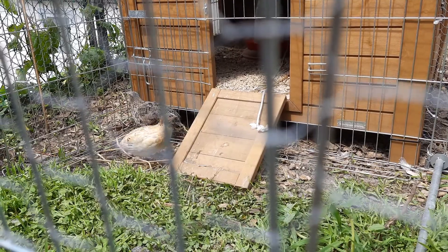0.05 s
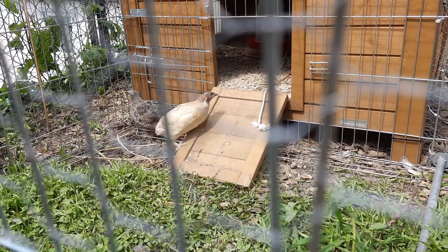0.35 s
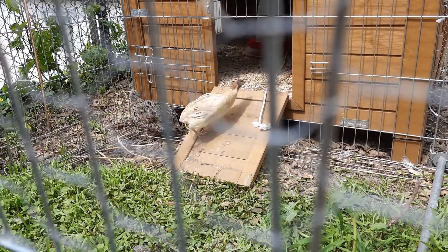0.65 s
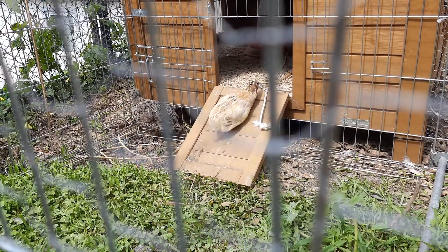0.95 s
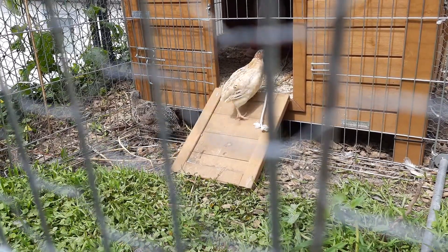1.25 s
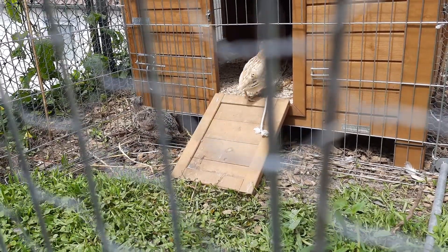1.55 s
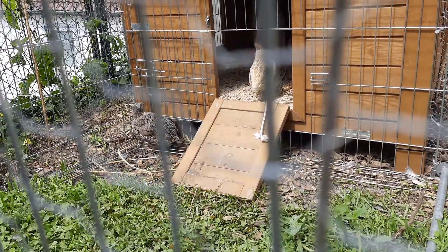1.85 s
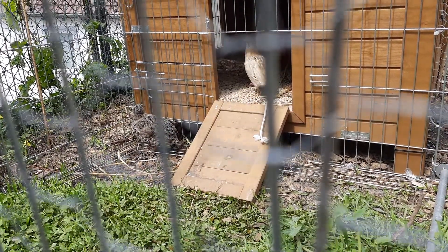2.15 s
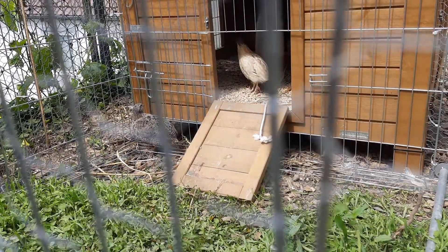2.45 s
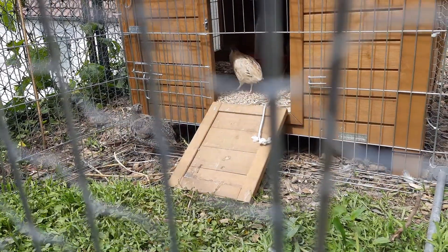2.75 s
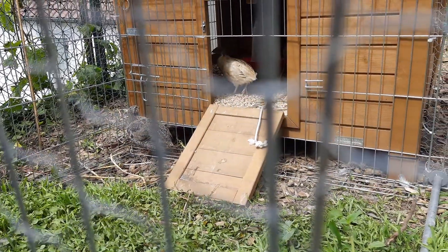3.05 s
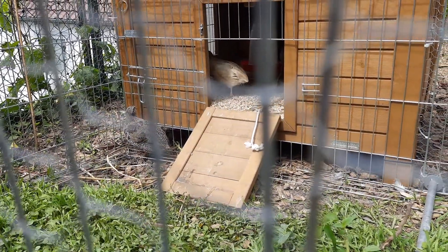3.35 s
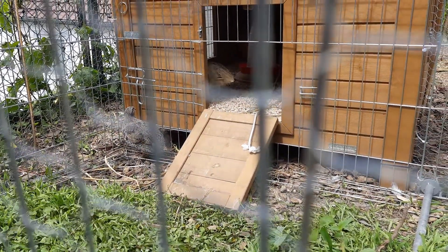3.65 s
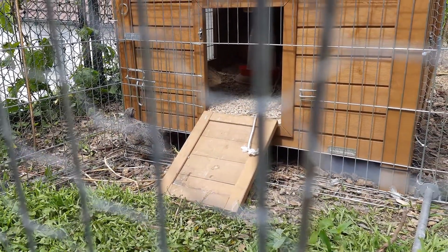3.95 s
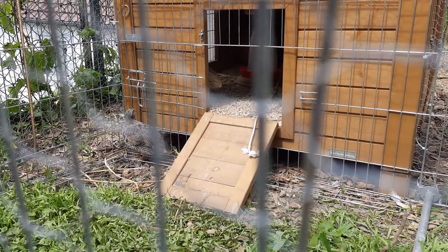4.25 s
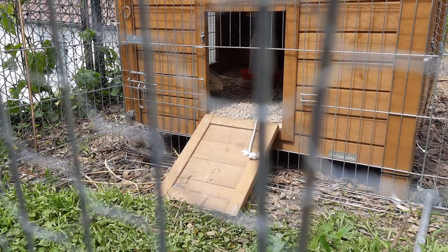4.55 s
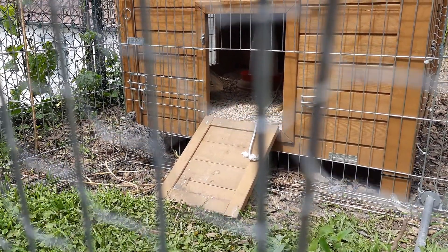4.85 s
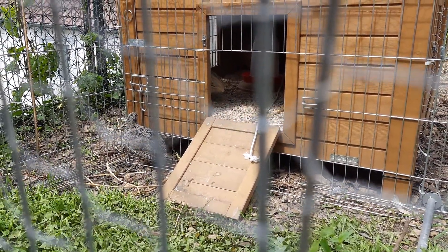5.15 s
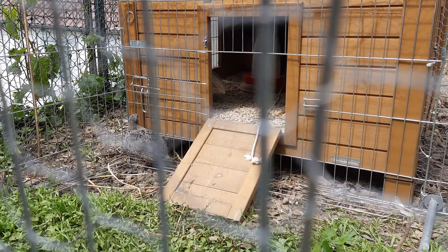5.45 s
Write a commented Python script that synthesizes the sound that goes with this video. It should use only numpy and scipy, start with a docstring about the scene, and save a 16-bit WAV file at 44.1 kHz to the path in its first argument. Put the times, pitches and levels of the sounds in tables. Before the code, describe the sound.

A quail's claws click, scratch and knock quickly on a wooden ramp, over a light crackle of dry litter. The steps stop within two seconds, leaving a few tiny rustles of shavings inside the hutch. Low wind buffets the microphone from side to side throughout, strongest at first. Faint songbirds and a dove call from the surrounding gardens with a short echo.

```python
"""First you hear wind thumping on the two ports (openings) of a microphone, in turn, with faint songbirds.
A quail scratches through dry litter and scrambles up a wooden ramp: its claws tick and scrape,
and each step makes the wood ring. From about two seconds on, it only stirs the bedding in its hutch.
Songbirds and a dove keep calling from the gardens around: gliding tones with a short echo.
The wind is low noise that swells with each gust; scrapes and rustles are bursts of crackly noise."""
import sys
import numpy as np
from scipy import signal
from scipy.fft import rfft, irfft, next_fast_len
from scipy.io import wavfile
from scipy.ndimage import uniform_filter1d, map_coordinates

SR = 44100
rng = np.random.default_rng(int(sys.argv[2]) if len(sys.argv) > 2 else 0)


def to_wav(s):
    """Save 16-bit WAV."""
    ch = np.atleast_2d(s).T  # columns
    pcm = np.round(np.clip(ch, -1, 1) * 32767)  # PCM
    wavfile.write(sys.argv[1], SR, pcm.astype(np.int16))


N = 242989  # samples, about 5.5 seconds

# Levels in the tables are relative: the functions turn whole layers up or down.
# A fade time is how long a sound takes to drop by 60 dB.

# Gusts on each port, and how rough the air is. Each row: time in seconds, level in dB.
GUSTS_LEFT = [(0.0, -38), (0.34, -27), (0.46, -40), (0.74, -26), (0.84, -54), (0.96, -33.5), (1.22, -28.5),
              (1.42, -59), (2.02, -49), (2.1, -30), (2.2, -47.5), (2.72, -33.5), (2.77, -51.5),
              (3.41, -41.5), (3.63, -65), (4.23, -78), (4.29, -49), (4.47, -77), (4.93, -38.5), (5.11, -57),
              (5.27, -47), (5.51, -63)]
GUSTS_RIGHT = [(0.0, -29.5), (0.079, -27.5), (0.141, -33), (0.2, -24.5), (0.4, -26.5), (0.5, -23.5),
               (0.56, -34.5), (1.84, -28), (2.02, -48), (2.16, -37.5), (2.28, -56), (2.459, -30),
               (2.52, -59), (2.85, -56.9), (2.95, -39), (3.23, -41), (3.29, -64), (3.37, -37),
               (4.072, -31.5), (4.19, -55), (4.25, -42.5), (4.392, -64), (4.452, -30), (4.629, -33),
               (4.71, -62.7), (4.911, -31.5), (4.97, -50.5), (5.51, -32)]
ROUGHNESS = [(0, 6), (1.85, -0.5), (2.6, -1), (4, -8.5), (5.51, -2)]
# Small swirls of air that hit a port.
# Each row: time in seconds, peak in dB, width in seconds, port (0 is left, 1 is right).
SWIRLS = [(0.073, -6, 0.0015, 1), (0.169, -11.5, 0.0014, 1), (0.205, -5, 0.0028, 1),
          (0.302, -5.5, 0.0011, 0), (0.313, -11, 0.001, 0), (.485, -2.5, 0.0012, 1), (.615, -11, 0.0016, 0),
          (1.342, -10.5, 0.0023, 1), (1.519, -16.5, 0.0015, 1), (1.826, -15, 0.0015, 1),
          (2.584, -13.5, 0.0022, 0), (4.457, -29.5, 0.0018, 1)]
# The wind's deep rumble and its finer churning. Each row: frequency in Hz, level in dB.
RUMBLE_TONE = [(20, -41), (35, -6), (55, 1), (110, 0.5), (160, -14.5), (250, -25), (400, -43), (800, -56),
               (2000, -93)]
CHURN_TONE = [(60, -4.5), (150, 12), (290, -2.5), (400, -10.5), (700, -31), (1500, -48.5), (5000, -68),
              (12000, -89)]

# Outdoor hush and a blur of far birds. Each row: time in seconds, level in dB.
HUSH_LEVEL = [(0, -66.5), (1.7, -68), (2.7, -70.5), (3.8, -69.5), (4.3, -72.5), (5.1, -71.5), (5.51, -69)]
CHORUS_LEVEL = [(0, -45.5), (.6, -88), (1.3, -68), (1.8, -57.5), (2.5, -61), (3, -55.5), (3.7, -53),
                (4.1, -68.5), (5.51, -83)]
# The tone of those two, and of a far rumble. Each row: frequency in Hz, level in dB.
HUSH_TONE = [(120, -36.5), (200, -3), (525, -11), (607, -19), (1330, -21.5), (2090, -14.5), (2850, -25.5),
             (4260, -33), (5110, -37.5), (6710, -35), (8200, -28.5), (10600, -41.5), (13900, -35.5),
             (15500, -41)]
CHORUS_TONE = [(1200, -45), (1750, -11), (2230, 9.5), (2500, 0), (2900, -15), (4500, -43)]
FAR_RUMBLE_TONE = [(20, -11), (45, 5.5), (70, -15.5), (150, -18), (400, -49), (1000, -61)]

# Mellow songbird whistles and dove coos. Each row: start in seconds, length in seconds,
# first pitch in Hz, last pitch in Hz, level in dB, hoarseness (waver as a share of the pitch).
WHISTLE_NOTES = [(0, 0.11, 2270, 2320, -82, 0.016), (.1, 0.29, 3280, 3230, -80, .008),
                 (.245, 0.14, 2164, 2300, -63, 0.0235), (1.07, .1, 2670, 2840, -71.5, 0.031),
                 (1.17, 0.19, 2620, 2400, -64, 0.017), (1.67, 0.16, 2130, 2285, -69.5, 0.039),
                 (2.18, 0.22, 2208, 2130, -76, 0.0077), (2.42, 0.43, 2420, 2570, -78.5, 0.0045),
                 (2.455, 0.022, 2113, 1953, -63.5, .006), (2.59, 0.15, 1990, 1755, -62, 0.0054),
                 (2.71, 0.078, 1780, 2030, -65, 0.018), (3.02, 0.069, 2410, 2310, -59.5, .008),
                 (3.05, 0.097, 2256, 2320, -56.5, 0.0087), (3.15, .11, 2303, 2356, -62.5, .03),
                 (3.3, 0.147, 2415, 2290, -62.5, 0.021), (4.1, .07, 1780, 1648, -71.5, 0.026),
                 (4.21, 0.09, 2093, 2135, -67, .004), (4.48, .12, 2420, 2307, -68.5, 0.015),
                 (4.88, 0.084, 1780, 1658, -71, 0.03), (5.26, 0.1, 1900, 2016, -65.5, 0.023),
                 (5.42, 0.088, 2040, 2149, -63.5, 0.016)]
DOVE_NOTES = [(2.15, 0.28, 423.3, 402.5, -74, 0.036), (2.54, 0.12, 414, 421, -71, 0.018),
              (3.42, .12, 498, 515, -72, 0.044), (5.275, 0.035, 456, 561, -61, 0.098),
              (5.42, 0.081, 556, 521, -62.5, 0.032)]
# Thin, raspy twitters. Each row: start in seconds, length in seconds, middle pitch in Hz, level in dB.
TWITTER_NOTES = [(0, 0.28, 4870, -74.5), (1.53, 0.19, 4800, -75), (2.304, 0.023, 4810, -69.5),
                 (2.389, 0.023, 4880, -72), (2.827, 0.034, 2690, -64), (2.979, 0.068, 4290, -74.5),
                 (3.009, .09, 3450, -75.5), (3.163, 0.066, 5800, -81), (3.28, .06, 5680, -82),
                 (3.39, 0.14, 6030, -85), (3.489, .13, 5600, -83), (4.205, .1, 4550, -80),
                 (4.49, 0.1, 4090, -74.5), (5.218, .08, 4010, -79)]
# Sharp chips, sung in pairs. Each row: start in seconds, level in dB.
CHIP_NOTES = [(3.81, -71.5), (3.873, -65), (4.077, -70.5), (4.144, -64.5), (5.375, -69.5), (5.463, -67)]
# A far bird's trills. Each row: start in seconds, end in seconds, chirps per second, level in dB.
TRILLS = [(0.966, 1.26, 33.4, -62), (1.382, 1.638, 24, -68.5), (1.78, 1.883, 27, -61)]
# The garden's echo. Each row: frequency in Hz, fade time in seconds.
ECHO_FADE = [(300, 0.2), (2000, 0.5), (6000, 0.31), (14000, 0.21)]

# Litter rustling underfoot, and feet shuffling between steps. Each row: time in seconds, level in dB.
LITTER_LEVEL = [(0, -71), (.22, -76), (.33, -61), (.49, -68), (.79, -54.5), (.83, -53), (.96, -68),
                (1.2, -65), (1.46, -71.5), (1.9, -81)]
SHUFFLE_LEVEL = [(.22, -78), (.42, -59.5), (.52, -62.5), (.85, -58.5), (1.25, -64.5), (1.7, -71)]
# Claws landing. Each row: start in seconds, tick level in dB, knock level in dB, fade time in seconds.
CLAW_HITS = [(.284, -40, -47, 0.05), (.375, -38, -48, 0.024), (.404, -24.5, -29, 0.036),
             (0.4647, -34, -34.5, 0.026), (0.5312, -33.5, -37.5, 0.03), (.639, -36, -34, 0.054),
             (0.6483, -24, -48, 0.042), (0.726, -30.5, -29, 0.019), (0.7693, -34.5, -39.5, 0.041),
             (0.8002, -24, -37.5, 0.032), (.8375, -49, -28.5, 0.033), (0.8683, -26.5, -39, 0.04),
             (0.9166, -33, -48, .036), (0.9494, -42, -39, 0.024), (.985, -31, -37, 0.03),
             (1.172, -33, -38.5, 0.039), (1.279, -28, -50, 0.027), (1.2941, -18, -43, .026),
             (1.3335, -43, -48, 0.024), (1.474, -47, -74, .021)]
# The tones the wooden ramp rings with. Each row: frequency in Hz, level in dB, fade time in seconds.
RAMP_TONES = [(462.3, -5, 0.19), (516, -0.5, 0.075), (607, -4, 0.07), (986, -4.5, 0.044),
              (1233, -5.5, 0.03), (1360, -7.5, 0.02), (1605, -10.5, 0.066), (2070, -5, 0.016),
              (2146, -0.5, 0.019), (2587, -5, 0.026), (3310, -7.5, 0.049)]
# Claws slipping, whole feet scuffing, and bedding stirring.
# Each row: time of the peak in seconds, level in dB, rise in seconds, fall in seconds.
CLAW_SLIPS = [(.385, -50, 0.017, 0.0087), (0.453, -38, 0.0052, 0.0061), (.577, -47.5, 0.013, 0.0032),
              (0.652, -35.5, 0.013, 0.0064), (0.711, -46, 0.0014, 0.0046), (0.789, -45, 0.016, 0.012),
              (0.835, -34.5, 0.011, 0.0025), (0.87, -48, 0.0016, 0.01), (0.984, -48.5, 0.019, 0.0062),
              (1.128, -52, 0.0038, 0.0017), (1.284, -44.5, 0.026, 0.0057)]
FOOT_SCUFFS = [(.408, -46, 0.0029, 0.009), (.467, -34.5, 0.0068, 0.0073), (.5335, -33.5, 0.001, 0.0037),
               (.647, -49.5, 0.018, 0.0074), (.728, -52.5, .0012, 0.01), (.839, -48.5, 0.002, 0.012),
               (.985, -57, 0.035, 0.011), (1.297, -50.5, 0.0017, 0.0051)]
BEDDING_STIRS = [(1.687, -60.5, 0.0041, 0.013), (2.033, -63.5, .003, 0.0085), (2.233, -73, 0.0018, 0.0068),
                 (2.71, -72.5, 0.021, 0.028), (4.4, -76, .012, 0.029), (5.064, -68.5, 0.0011, 0.0032)]
# The tone of claws and litter, shuffles, scuffs and bedding. Each row: frequency in Hz, level in dB.
CLAW_TONE = [(300, -22), (1000, -25), (2200, 0), (4000, -8), (7000, 0), (10500, -3), (13000, -5.5),
             (16000, -2.5)]
SHUFFLE_TONE = [(200, -15), (470, 1), (750, -11.5), (1100, -9.5), (2200, -6), (4500, -15), (12000, -45)]
SCUFF_TONE = [(300, 1), (600, -8.5), (1100, 2), (2100, 4.5), (2900, -4), (4000, -11), (8000, -62)]
BEDDING_TONE = [(1500, -37), (5500, -25), (7500, -1), (9500, 0), (11500, -9), (15000, -14)]

# How each port colours sound. Each row: frequency in Hz, gain in dB.
LEFT_TONE = [(400, 1), (1200, 2), (2300, 0), (3300, -3), (4400, -3), (7800, -7), (8800, 1.5), (10200, 6),
             (15000, 1)]
RIGHT_TONE = [(400, 1), (1200, -2), (2300, -8), (3300, -1.5), (4400, 3), (7800, 0.5), (8600, -5),
              (9500, -4.5), (15000, -2.5)]
# Sound arriving from ahead. Each row: frequency in Hz, how far the left port leads in radians.
LEFT_LEAD = [(400, 0), (1400, 1.02), (2200, 0.2), (3500, 2.07), (4600, -4), (8000, -5), (10000, -8.5),
             (15000, -2)]


def amp(db):
    """Turn decibels into a number to multiply by."""
    return 10 ** (np.asarray(db) / 20)


def unit(x):
    """Scale a signal to an average strength (rms) of 1."""
    return x / np.sqrt(np.mean(x ** 2) + 1e-20)


def along(points, hz):
    """Read a frequency table between its rows, on a log scale."""
    freqs, values = np.transpose(points)
    return np.interp(np.log(hz + 1), np.log(freqs + 1), values)


def curve(rows):
    """Join the rows of a time table with straight lines, one value per sample."""
    return np.interp(np.arange(N) / SR, *np.transpose(rows))


def wobble(rate, size=N):
    """A smooth curve through `rate` random values per second."""
    points = rng.standard_normal(int(size * rate / SR) + 4)
    return map_coordinates(points, [np.arange(size) * rate / SR])


def filtered(x, response):
    """Multiply each frequency in x by response(hz)."""
    size = next_fast_len(N + SR // 2)
    return irfft(rfft(x, size) * response(np.fft.rfftfreq(size, 1 / SR)), size)[..., :N]


def coloured(x, tone):
    """Shape x with a tone table, then scale it to strength 1."""
    return unit(filtered(x, lambda hz: amp(along(tone, hz))))


def noise(tone):
    """Steady noise with the given tone."""
    return coloured(rng.standard_normal(N), tone)


def noise_pair(tone):
    """A separate noise for each port."""
    return np.array([noise(tone), noise(tone)])


def grit(tone, spiky_db):
    """Dry crackle with grains of uneven size; scattering makes it differ at the two ports."""
    grains = rng.standard_normal(N) + rng.standard_normal((2, N))
    return coloured(grains * amp(spiky_db * np.minimum(wobble(1100), 2)), tone)


def strokes(rows):
    """A loudness curve of short strokes that swell and die away."""
    t = np.arange(N) / SR
    return sum(amp(db) * np.exp(-np.maximum((s - t) / rise, (t - s) / fall))
               for s, db, rise, fall in rows)


def add(track, start, x):
    """Mix x into the track, beginning at `start` seconds."""
    part = track[max(round(start * SR), 0):][:len(x)]
    part += x[:len(part)]


def from_left(x, lag_s):
    """Make a sound reach the left port first and the right port lag_s later."""
    return filtered(x, lambda hz: np.exp(1j * np.pi * hz * lag_s * np.array([[1], [-1]])))


def wind(flutter_db=2, churn_growth=1.88, low_cut_hz=58):
    """Gusts rumble on each port and churn more as they grow; swirls thump and ring in the bass filter."""
    t = np.arange(N) / SR
    gust_db = np.array([curve(rows) + flutter_db * wobble(14) for rows in (GUSTS_LEFT, GUSTS_RIGHT)])
    rumble = noise_pair(RUMBLE_TONE)
    power = np.abs(uniform_filter1d(rumble ** 2, size=1800))
    rumble /= np.sqrt(power + 0.015)  # even it out, so the gust sets the strength
    ports = amp(gust_db - 0.12) * rumble
    churn_db = -47 + churn_growth * (gust_db + 28)
    churn = amp(churn_db + curve(ROUGHNESS) + 4.2 * wobble(45))
    for s, db, width, port in SWIRLS:
        ports[int(port)] -= amp(db - 2) * np.exp(-((t - s) / width) ** 2)
        churn[int(port)] += strokes([(s, db - 22, 0.0046, 0.025)])  # rough air around the swirl
    ports += churn * noise_pair(CHURN_TONE)
    low_cut = signal.butter(N=4, Wn=low_cut_hz, btype="high", fs=SR, output="sos")
    return signal.sosfilt(low_cut, ports)


def background():
    """Outdoor hush, a blur of far birdsong and a faint rumble, all made of noise."""
    hush = amp(curve(HUSH_LEVEL) + 6.5) * noise_pair(HUSH_TONE)
    chorus = amp(curve(CHORUS_LEVEL) - 14 + 2.4 * wobble(10)) * noise_pair(CHORUS_TONE)
    return hush + chorus + amp(-59) * noise(FAR_RUMBLE_TONE)


def whistles(notes, ease, flicker_db=-1.5, overtone_db=-56, waver_rate=467):
    """Almost pure notes that swell and glide; an ease above 1 slows the glide towards its end."""
    track = np.zeros(N)
    for start, length, first_hz, last_hz, db, hoarse in notes:
        progress = np.linspace(0, 1, int(length * SR))
        pitch = last_hz + (first_hz - last_hz) * (1 - progress) ** ease
        pitch *= 1 + hoarse * wobble(waver_rate, len(pitch))  # a fast waver sounds hoarse
        phase = 2 * np.pi * np.cumsum(pitch) / SR
        flicker = amp(flicker_db * wobble(50.5, len(pitch)))
        swell = unit(np.sqrt(np.abs(np.sin(np.pi * progress))) * flicker)
        add(track, start, amp(db) * swell * (np.sin(phase) + amp(overtone_db) * np.sin(2 * phase)))
    return track


def songbirds(sag=0.04, twitter_hoarse=0.06, chip_s=0.024, chip_hz=(4000, 2650), chip_hoarse=0.022):
    """Three voices: mellow whistles, raspy twitters that sag in pitch, and chips that all fall alike."""
    twitters = [(s, length, hz * (1 + sag), hz * (1 - sag), db, twitter_hoarse)
                for s, length, hz, db in TWITTER_NOTES]
    chips = [(s, chip_s, *chip_hz, db, chip_hoarse) for s, db in CHIP_NOTES]
    song = whistles(WHISTLE_NOTES, ease=1.776) + whistles(chips, ease=1.28)
    song += whistles(twitters, ease=0.84, flicker_db=3)
    # distance dulls the high notes
    return filtered(song, lambda hz: amp(along([(2600, 2), (3500, -0.5), (5000, -2)], hz)))


def garden_echo(x):
    """Fences and trees scatter sound into a fading wash, different at each port."""
    hz, t, spectrum = signal.stft(rng.standard_normal((2, SR)), SR, nperseg=256)
    fade = amp(-60 * t / along(ECHO_FADE, hz)[:, None])
    tail = signal.istft(spectrum * fade, SR, nperseg=256)[1]
    return signal.fftconvolve(x[None], tail / np.linalg.norm(tail[0]), axes=1)[:, :N]


def litter_and_shuffle():
    """Dry litter crackles and feet shuffle on the board until the quail is inside."""
    outside = curve([(1.7, 1), (2, 0)])
    litter_db = curve(LITTER_LEVEL) - 5 + 8.3 * np.minimum(wobble(59.55), 1.3)
    litter = amp(litter_db) * grit(CLAW_TONE, spiky_db=5.5)
    shuffle = amp(curve(SHUFFLE_LEVEL) + 4.1 * wobble(40.13)) * noise(SHUFFLE_TONE)
    return outside * (litter + shuffle)


def claw_steps():
    """Each claw snaps on the ramp and skids briefly, making the wood ring a little differently."""
    ticks, knocks = np.zeros((2, N))
    t = np.arange(SR // 2) / SR
    hz, tone_db, ring_s = np.transpose(RAMP_TONES)[:, :, None]
    for start, tick_db, knock_db, skid_s in CLAW_HITS:
        strength, detune, phase = rng.standard_normal((3, len(RAMP_TONES), 1))
        waves = np.sin(2 * np.pi * (hz * (1 + 0.014 * detune) * t + phase))
        ring = (amp(tone_db + 1.8 * strength - 60 * t / ring_s) * waves).sum(0)
        snap = 0.4 * amp(-60 * t / 0.005)
        attack = 1 - np.exp(-t / 0.0005)
        contact = attack * (snap + amp(-60 * t / skid_s))
        skid = contact * rng.standard_normal(len(t))
        knock = signal.fftconvolve(ring, skid / np.linalg.norm(skid))  # the skid shakes the wood
        add(knocks, start, amp(knock_db - 7) * knock)
        add(ticks, start, amp(tick_db - 8.5) * contact)
    return knocks + ticks * grit(CLAW_TONE, spiky_db=0.5)


def scrapes():
    """Slipping claws give a bright scratch; whole feet give a duller scuff."""
    slips = strokes(CLAW_SLIPS)
    rubbing = strokes(FOOT_SCUFFS) + amp(-17) * slips  # every slip also shakes the board
    board = rubbing * noise(SCUFF_TONE) * amp(2.9 * wobble(500))
    return board + slips * grit(CLAW_TONE, spiky_db=3.5)


def bird_trill(top_hz=1450, bottom_hz=900, fade_s=0.092):
    """A far bird rattles off quick runs of falling chirps."""
    t, track = np.arange(N) / SR, np.zeros(N)
    for start, end, rate, db in TRILLS:
        progress = ((t - start) * rate + 0.11 * wobble(12)) % 1  # from 0 to 1 in each chirp
        pitch = (top_hz + (bottom_hz - top_hz) * progress) * (1 + 0.0404 * wobble(300))
        chirps = np.sin(np.pi * progress) ** 2 * np.sin(2 * np.pi * np.cumsum(pitch) / SR)
        fade = np.clip(np.minimum(t - start, end - t) / fade_s, 0, 1)
        track += amp(db) * fade * chirps
    return track


def bedding():
    """Shavings in the hutch stir with a soft, high rustle."""
    return strokes(BEDDING_STIRS) * grit(BEDDING_TONE, spiky_db=2.5)


def dove():
    """A dove coos: low gliding notes with a soft overtone an octave up."""
    return whistles(DOVE_NOTES, ease=1.7, overtone_db=-18, waver_rate=172)


def scene():
    """Wind on the microphone, the quail close ahead, and far birds heard largely through their echoes."""
    quail = claw_steps() + litter_and_shuffle() + scrapes() + bedding()
    near = filtered(quail, lambda hz: np.exp(0.5j * along(LEFT_LEAD, hz) * np.array([[1], [-1]])))
    near += amp(-16) * garden_echo(quail[0])
    song, coos, trill = songbirds(), dove(), bird_trill()
    birds = from_left(amp(1.5) * song + trill, lag_s=0.00034) + amp(2) * coos
    echoes = amp(2) * garden_echo(song) + amp(7.5) * garden_echo(coos + trill)
    return near + birds + echoes + background() + wind()


def record(dry, top_hz=15900):
    """Each port colours the sound in its own way; nothing above top_hz gets through."""
    t = np.arange(N) / SR
    fade = np.minimum(np.minimum(t, t[::-1]) / 0.004, 1)  # avoids a click at either end
    return filtered(dry * fade,
                    lambda hz: amp([along(LEFT_TONE, hz), along(RIGHT_TONE, hz)]) * (hz < top_hz))


dry = scene()
out = record(dry)
to_wav(out)
```